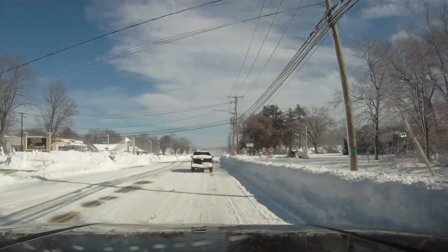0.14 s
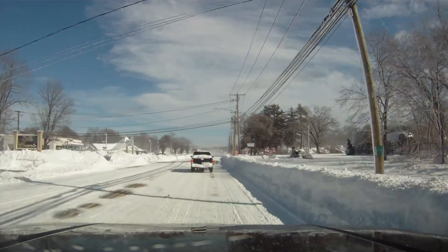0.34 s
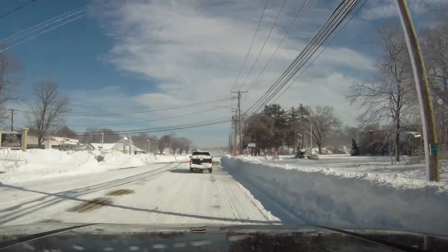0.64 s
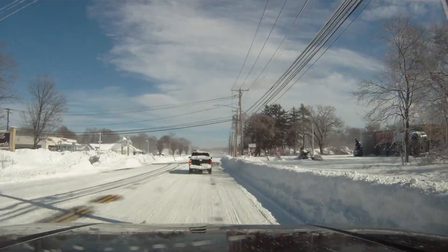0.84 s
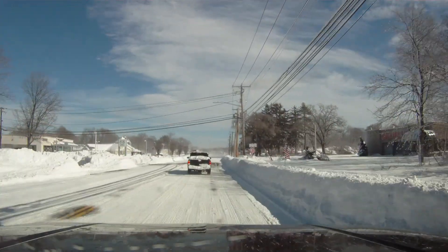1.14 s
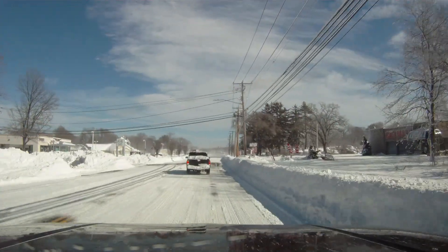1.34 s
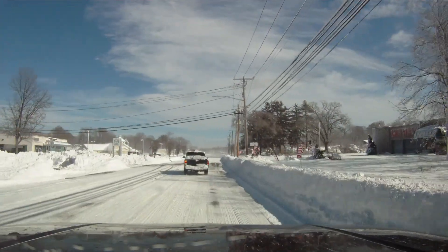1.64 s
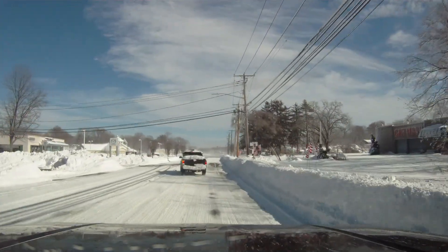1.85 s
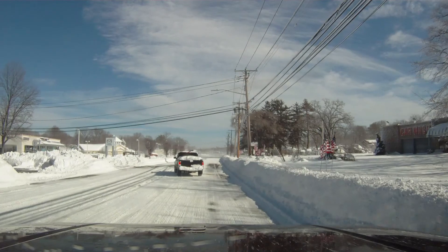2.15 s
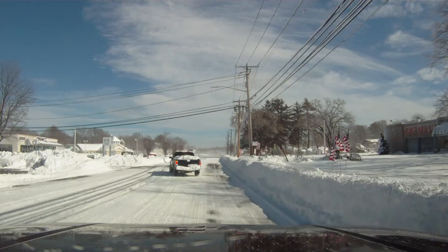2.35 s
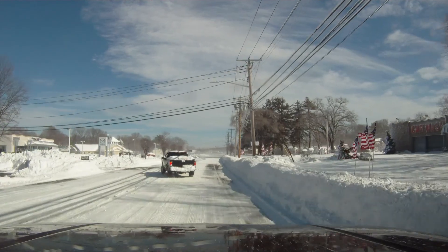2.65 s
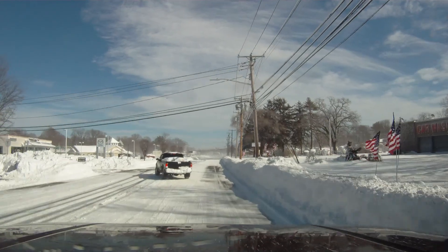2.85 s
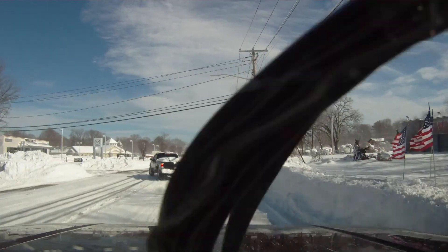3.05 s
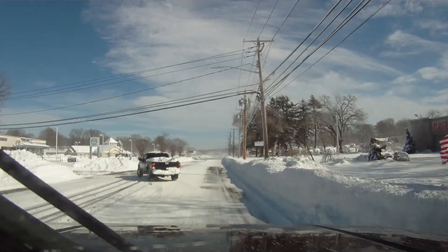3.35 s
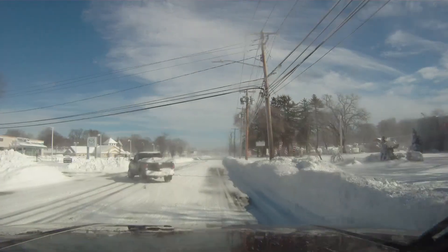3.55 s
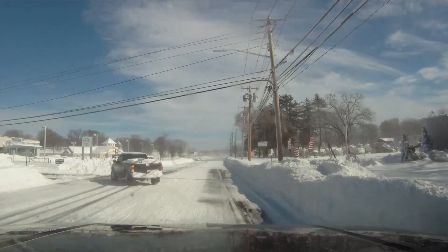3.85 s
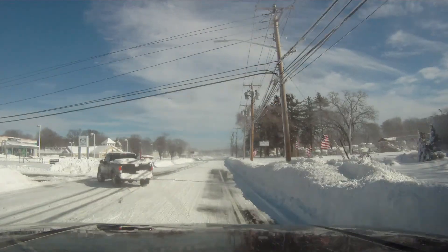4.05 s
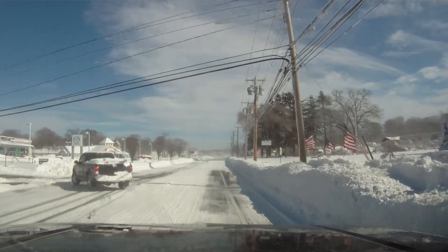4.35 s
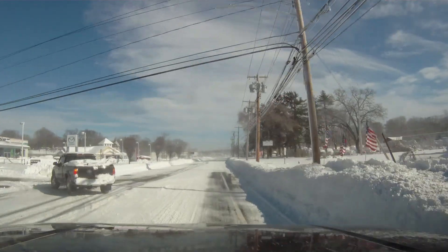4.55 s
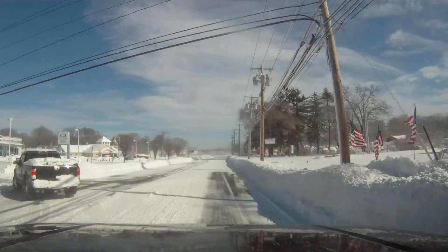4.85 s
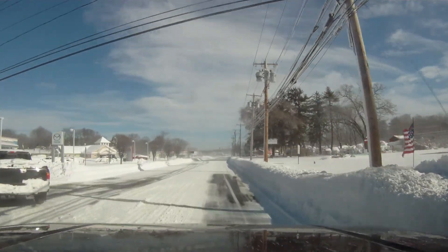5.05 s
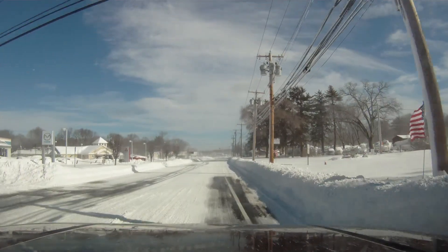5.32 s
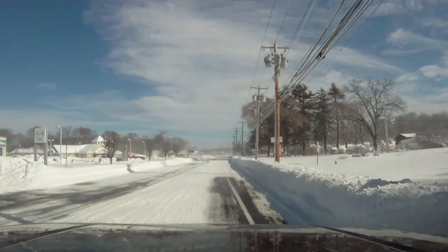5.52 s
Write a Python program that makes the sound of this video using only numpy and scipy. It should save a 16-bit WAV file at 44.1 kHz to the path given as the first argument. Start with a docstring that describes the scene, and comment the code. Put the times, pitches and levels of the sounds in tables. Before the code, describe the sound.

Low cabin rumble and engine hum on a snowy road, with small rattles, interrupted by one loud, juddering wiper scrape before the hum rises higher.

```python
"""A car rumbles along a snowy road, heard from a camera mounted behind the windscreen: shaped noise
for body and snow, stacked sines for the engine, ringing noise puffs for ticking plastic and thin chirps.
Ruts jolt and creak; the engine holds its pitch, then climbs from about two seconds.
Midway the wipers knock, rasp and judder over icy glass: random slips and snags ring the pane.
A gain control pulls the whole mix down while they scrape."""
import sys
import numpy as np
from scipy import signal
from scipy.fft import rfft, irfft
from scipy.io import wavfile
from scipy.ndimage import uniform_filter1d

SR = 44100
rng = np.random.default_rng(int(sys.argv[2]) if len(sys.argv) > 2 else 0)


def generate_wav(sig):
    """Save sig (samples, or channels by samples) to the path in sys.argv[1] as 16-bit PCM at SR."""
    pcm = np.round(np.clip(np.atleast_2d(sig).T, -1, 1) * 32767).astype(np.int16)
    wavfile.write(sys.argv[1], SR, pcm)


N = 250488
T = np.arange(N) / SR


def amp(db):
    """Turns decibels into an amplitude factor."""
    return 10 ** (np.asarray(db) / 20)


def unit(x):
    """Scales to rms 1."""
    return x / np.sqrt(np.mean(x ** 2) + 1e-20)


def curve(rows, column=1):
    """One column of a table, joined by straight lines in time."""
    rows = np.array(rows)
    return np.interp(T, rows[:, 0], rows[:, column])


def envelope(start, end, rise_s, fall_s):
    """Rises from start, holds until end, then dies away exponentially."""
    rise = np.clip((T - start) / rise_s, 0, 1)
    return rise * np.exp(-np.maximum(T - end, 0) / fall_s)


def decay(t, t60):
    """Exponential fading that drops 60 dB in t60 seconds."""
    return np.exp(-np.log(1000) * t / t60)


def smooth(x, seconds):
    """Follows x with a lag."""
    r = np.exp(-1 / (seconds * SR))
    return signal.lfilter([1 - r], [1, -r], x)


def add(mix, s, sound):
    """Lays a sound into the mix at time s."""
    part = mix[max(round(s * SR), 0):][:len(sound)]
    part += sound[:len(part)]


def spectrum_db(points, hz):
    """Joins the points of a spectrum by straight lines over log frequency."""
    f, db = np.transpose(points)
    return np.interp(np.log(hz + 1), np.log(f), db)


def noise(points):
    """Steady noise with the given spectrum shape, rms 1."""
    hz = np.fft.rfftfreq(N, 1 / SR)
    return unit(irfft(rfft(rng.standard_normal(N)) * amp(spectrum_db(points, hz)), N))


def wander(hz):
    """Slow random drift, up to about hz, rms 1."""
    f = np.fft.rfftfreq(N, 1 / SR)
    return unit(irfft(rfft(rng.standard_normal(N)) / (1 + (f / hz) ** 4), N))


def response(points, modes=(), size=4096):
    """Causal (minimum-phase) impulse response of a spectrum with resonances on top."""
    hz = np.fft.rfftfreq(size, 1 / SR)
    db = spectrum_db(points, hz)
    for at, width, lift in modes:
        db = db + lift / (1 + (2 * (hz - at) / width) ** 2)
    # folding the cepstrum moves all the energy after the strike
    cepstrum = irfft(np.log(amp(db)))
    cepstrum[1:size // 2] *= 2
    cepstrum[size // 2 + 1:] = 0
    return irfft(np.exp(rfft(cepstrum)))


def burst(colour, t60, rise_s, size=4096):
    """A coloured puff of noise that builds up and dies, peak 1."""
    t = np.arange(size) / SR
    swell = (1 - np.exp(-t / rise_s)) * decay(t, t60)
    x = signal.fftconvolve(rng.standard_normal(size) * swell, colour)[:size]
    return x / abs(x).max()


def repeat_bursts(rows, points, t60, lift_db, fresh, rise_s):
    """One noise puff sounds again and again, each time a little differently."""
    colour, out = response(points), np.zeros(N)
    ring = burst(colour, t60, rise_s)
    for s, db in rows:
        hit = ring + fresh * burst(colour, t60, rise_s)
        add(out, s, amp(db + lift_db) * hit / abs(hit).max())
    return out


def speed():
    """Gain in speed since the start, in octaves of engine pitch."""
    return np.log2(curve(ENGINE_RUN) / ENGINE_RUN[0][1])


# Shape of the body rumble: freq_hz, relative level_db (per Hz)
RUMBLE_SHAPE = [(10, -22.5), (18, -20.5), (26, -9), (36, -2.5), (42, -1.5), (49, -3), (58, -6.5),
                (70, -13.5), (82, -19), (114, -20), (150, -26), (220, -55), (350, -110)]
# Roughness of the road, which drives rumble, roar and hiss: time_s, relative level_db
ROAD_ROUGHNESS = [(0, 0), (0.75, 0.5), (1.3, -0.5), (1.7, 0.5), (2.15, -0.5), (2.39, -3.5), (2.5, 1.5),
                  (3.2, -0.5), (3.65, 7), (3.93, -2.5), (4.25, -1), (5.68, 3)]


def body(level_db=-18.0, db_per_octave=-1.0):
    """The car body shakes as the wheels ride the ruts; its swells are evened out."""
    rumble = noise(RUMBLE_SHAPE)
    rumble /= np.sqrt(uniform_filter1d(rumble ** 2, size=7000) + 0.028)
    return amp(level_db + curve(ROAD_ROUGHNESS) + db_per_octave * speed()) * rumble


# Shape of the snow roar: freq_hz, relative level_db (per Hz)
ROAR_SHAPE = [(53, -23), (90, -9.5), (118, -4.5), (150, -17), (177, -9.5), (242, -14.5), (302, -12),
              (429, -21), (470, -20), (648, -30.5), (1000, -45), (1300, -73), (2200, -120)]
# Shape of the snow hiss: freq_hz, relative level_db (per Hz)
HISS_SHAPE = [(500, -3), (900, -0.5), (1500, -5.5), (2800, -5), (4400, -13), (5300, -19.5), (6000, -32.5),
              (7200, -18), (9200, -14.5), (10800, -23.5), (12000, -7.5), (13100, -31), (14900, -16),
              (15800, -34)]


def tyres(roar_db=-31.0, roar_db_per_octave=4.5, roar_follow=0.78, hiss_db=-50.0, hiss_db_per_octave=3.0,
          hiss_follow=0.52, lumpy_db=1.48, hiss_lumpy_db=1.42, flicker_db=2.5):
    """Roar and hiss of packed snow grow with speed and rough road, and flutter with its lumps."""
    lumps, road, fast = wander(24), curve(ROAD_ROUGHNESS), speed()
    roar_level = roar_db + roar_db_per_octave * fast + roar_follow * road + lumpy_db * lumps
    hiss_level = hiss_db + hiss_db_per_octave * fast + hiss_follow * road + hiss_lumpy_db * lumps
    hiss_level = hiss_level + flicker_db * wander(86)
    return noise(ROAR_SHAPE) * amp(roar_level) + noise(HISS_SHAPE) * amp(hiss_level)


# Shape of a thin hiss high up: freq_hz, relative level_db (per Hz)
WHINE_SHAPE = [(10700, -50), (11550, -11.5), (12000, 6), (12450, -21), (13300, -42)]


def whine(level_db=-62.0, rise_db=5.5):
    """A narrow band of hiss that slowly grows louder."""
    return noise(WHINE_SHAPE) * amp(level_db + rise_db * T / T[-1])


# Run of the engine: time_s, firing_hz, level_db (rms of an order at 0 dB)
ENGINE_RUN = [(0, 50, -27.5), (2.1, 50, -30), (2.7, 54.3, -26.5), (3.35, 62.89, -25.5), (3.8, 66.3, -25),
              (4.3, 68.6, -23), (5.68, 71.36, -22.5)]
# Firing hum and drive train: multiple (of the firing rate), relative level_db
DRIVE_ORDERS = [(0.998, 1), (1.379, -14), (1.571, -7), (2.004, -15.5), (2.62, -20)]


def engine(waver=0.0063, throb_db=2.0):
    """Firing hum and the orders of the drive train: sines locked to one wavering pitch."""
    turns = np.cumsum(curve(ENGINE_RUN) * (1 + waver * wander(6.1))) / SR
    hum = np.zeros(N)
    for multiple, db in DRIVE_ORDERS:
        tone = np.sin(2 * np.pi * (multiple * turns + rng.random()))
        hum += amp(db + throb_db * wander(4.5)) * tone
    return np.sqrt(2) * amp(curve(ENGINE_RUN, 2)) * hum


def faint_ticks(count=60, per_s=2.5, level_db=-38.5, spread_db=2):
    """Among the hard ticks the loose part taps softly, at random: start_s, level_db before the lift."""
    gap, strength = rng.random((count, 2)).T
    times = np.cumsum(2 * gap / per_s)
    levels = level_db + spread_db * (2 * strength - 1)
    return [(s, db) for s, db in zip(times, levels) if s < T[-1]]


# Hardest ticks of a loose plastic part: start_s, peak level_db (before the lift)
HARD_TICKS = [(0.0607, -31.5), (0.1228, -36), (0.2638, -29.5), (0.4558, -34.5), (0.5589, -29), (0.594, -29),
              (0.6372, -29.5), (0.6717, -28), (0.715, -33), (0.7536, -24.5), (0.8939, -29), (0.9717, -33.5),
              (1.0565, -26.5), (1.1079, -34.5), (1.1689, -26), (1.4277, -34), (1.5262, -32.5),
              (1.6217, -32.5), (1.6544, -32), (1.7018, -25.5), (1.732, -28.5), (1.7782, -29.5),
              (1.9031, -30), (2.1141, -29.5), (2.147, -28.5), (2.195, -34), (3.3207, -31), (3.3508, -28.5),
              (3.4838, -29.5), (3.5119, -30.5), (3.8611, -35), (3.9427, -33.5), (4.0627, -30),
              (4.0966, -28), (4.2318, -31.5), (4.2691, -35), (4.3061, -33), (4.342, -34.5), (4.3896, -36.5),
              (4.587, -28), (4.8464, -27), (4.8918, -32), (4.9226, -30), (5.011, -35), (5.0881, -32),
              (5.3602, -34), (5.4765, -34), (5.5303, -30.5), (5.5588, -30)]
# Colour of a tick: freq_hz, relative level_db
TICK_SHAPE = [(600, -25.5), (1100, -3), (2400, -15), (2950, 1.5), (3900, -1.5), (4800, -15.5), (5400, -16),
              (6000, -39), (7000, -20), (8400, -7.5), (9200, -10.5), (10000, -26.5), (14000, -22.5),
              (14900, -13), (15800, -20.5)]


def ticks():
    """A loose plastic part ticks as short bright puffs, hard ones timed and soft ones random."""
    rows = list(HARD_TICKS) + faint_ticks()
    return repeat_bursts(rows, TICK_SHAPE, t60=0.057, lift_db=1.15, fresh=0.16, rise_s=0.00053)


# Beats on which the thin chirp sounds: beat (count from the first)
CHIRP_STEPS = [0, 2, 4, 8, 11, 14, 20, 24, 27, 30, 32, 34]
# Colour of a chirp: freq_hz, relative level_db
CHIRP_SHAPE = [(2000, -20), (3400, 6.5), (4200, -3.5), (5300, 2.5), (6000, -17.5), (6800, 0), (8200, -7),
               (9600, -21), (15000, -10)]


def chirps(start_s=0.203, beat_s=0.1582, peak_db=-37):
    """A thin chirp on a steady beat, skipping most beats."""
    rows = [(start_s + beat_s * beat, peak_db) for beat in CHIRP_STEPS]
    return repeat_bursts(rows, CHIRP_SHAPE, t60=0.1, lift_db=0, fresh=0.28, rise_s=0.0025)


# Ruts in the road: time_s, push_db (peak), creak_db (peak, before the lift)
RUTS = [(0.305, -5, -29), (0.416, -5, -32), (0.776, -4, -33), (0.908, -6, -28), (1.664, -7, -30),
        (1.722, -22, -26), (2.079, -6, -30), (3.826, -4.5, -21.5), (4.794, -5.5, -30)]


def jolts(swing_hz=42.2, half_length_s=0.0086, size=4000):
    """Each deep rut swings the body once, a brief low pulse centred on the rut."""
    t, out = (np.arange(size) - size / 2) / SR, np.zeros(N)
    swing = np.cos(2 * np.pi * swing_hz * t) * np.exp(-(t / half_length_s) ** 2)
    for s, push_db, _ in RUTS:
        add(out, s + t[0], amp(push_db) * swing)
    return out


def creaks():
    """The mount creaks on each rut, a very short hissy puff."""
    rows = [(s, creak_db) for s, _, creak_db in RUTS]
    return repeat_bursts(rows, HISS_SHAPE, t60=0.013, lift_db=1.5, fresh=1.1, rise_s=0.0024)


def cabin_boom(start_s=0.65, end_s=1.174, rise_s=0.41, fall_s=0.049, peak_db=-15, boom_hz=36, waver=0.053):
    """The cabin air resonates for a moment, a low sine with a wavering pitch."""
    boom = np.sin(2 * np.pi * np.cumsum(boom_hz * (1 + waver * wander(4.3))) / SR)
    return boom * amp(peak_db) * envelope(start_s, end_s, rise_s, fall_s)


# Dull knocks of body and wiper arms: start_s, ring_db, pitch_hz, ring_s (to -60 dB), clatter_db (peak)
DULL_KNOCKS = [(2.002, -10, 241, 0.084, -19), (2.004, -13, 151, 0.18, -32),
               (2.528, -13.5, 196, 0.057, -16.5), (2.586, -17, 386, 0.035, -11),
               (2.681, -11.5, 107, 0.24, -16.5), (2.789, -4.5, 125, 0.061, -12),
               (3.288, -27, 292, 0.053, -21), (3.327, -17.5, 343, 0.067, -18),
               (3.813, -11, 120.7, 0.19, -40)]
# Colour of the clatter: freq_hz, relative level_db
CLATTER_SHAPE = [(100, 1), (250, -2.5), (600, -5.5), (1200, -15), (1600, -25.5), (3000, -23), (4600, -44),
                 (6000, -64), (7500, -43), (9500, -35), (12200, -30), (15000, -43)]


def knocks(clatter_t60=0.07, rise_s=0.0016, size=6000):
    """Body and wiper arms knock: a short low ring under a dull clatter."""
    t, out, colour = np.arange(size) / SR, np.zeros(N), response(CLATTER_SHAPE)
    for s, ring_db, hz, t60, clatter_db in DULL_KNOCKS:
        ring = -np.sin(2 * np.pi * hz * t) * decay(t, t60)
        add(out, s, amp(ring_db) * ring)
        add(out, s, amp(clatter_db) * burst(colour, clatter_t60, rise_s))
    return out


# Blades drag lightly, bite into the ice, then slide to rest: start_s, end_s, drag_db (as each starts)
BLADE_STROKES = [(2.67, 2.785, -32.5), (2.784, 3.184, -15), (3.192, 3.225, -22.5)]


def drag(bite_s=0.014, growth_db_per_s=6.5, let_go_s=0.0075):
    """How hard the blades rub on the glass: each stroke builds up, grows heavier and lets go."""
    total = np.zeros(N)
    for start, end, db in BLADE_STROKES:
        load_db = db + growth_db_per_s * (np.clip(T, start, end) - start)
        total += amp(load_db) * envelope(start, end, bite_s, let_go_s)
    return total


def wiper_arms(start_s=2.5, end_s=3.35, rise_s=0.17, fall_s=0.03, rumble_db=-28.5, swish_db=-52, judder_db=-7):
    """The moving arms rumble and swish, and judder when the blades drag."""
    moving = envelope(start_s, end_s, rise_s, fall_s)
    low = noise(ROAR_SHAPE) * (amp(rumble_db) * moving + amp(judder_db) * drag())
    swish = noise(HISS_SHAPE) * amp(swish_db) * moving
    return low + swish


# Colour of the screen: freq_hz, relative level_db
GLASS_SHAPE = [(60, -17.5), (165, 0), (520, -0.5), (740, -13.5), (1100, -10.5), (1400, -17), (2900, -21),
               (4400, -18.5), (5200, -38.5), (6100, -43.5), (7000, -35.5), (7900, -22.5), (12000, -30),
               (15200, -30)]
# Resonances of screen and mount: freq_hz, width_hz, lift_db (negative cuts)
SCREEN_MODES = [(174, 35, 7.5), (401, 80, 4.5), (525.5, 27, 5.5), (972, 230, 6), (1115, 80, 5),
                (2305, 270, 11), (2920, 234, 12.5), (3620, 210, -5), (8800, 350, -10), (9120, 160, 12),
                (10430, 170, -9), (13300, 600, -2)]


def glass_ring(echo=0.033, echo_t60=0.02, size=1200):
    """Ring of screen and mount; the sound bounces between the pane's edges along fixed paths."""
    t = np.arange(size) / SR
    paths = echo * rng.standard_normal(size) * decay(t, echo_t60)
    paths = signal.lfilter(*signal.butter(3, 2800, "high", fs=SR), paths)
    paths[0] += 1  # the direct sound
    return signal.fftconvolve(response(GLASS_SHAPE, SCREEN_MODES), paths)


def blade_scrape(glass, slips_per_s=650, spread_db=3.0, rub=0.14, rasp_db=0.5):
    """Rubber sticks and slips on icy glass; each random slip rings the screen and the mount."""
    happens = rng.random(N) < slips_per_s / SR
    strength = amp(spread_db * np.minimum(rng.exponential(1, N), 2.5))
    slips = happens * strength * rng.choice([-1, 1], N)
    rubbing = unit(slips) + rub * rng.standard_normal(N)
    force = amp(rasp_db) * drag() * rubbing
    return signal.fftconvolve(force, glass / np.linalg.norm(glass))[:N]


# Blades snag and snap free: start_s, peak level_db (before the lift)
BLADE_SNAGS = [(2.758, -18.5), (2.804, -12.5), (2.823, -6.5), (2.8336, -3.5), (2.8495, 2.5), (2.8723, -3.5),
               (2.92, -4), (2.929, -1), (2.9416, -9), (2.9971, 3.5), (3.032, -15), (3.0888, -5),
               (3.1333, 4.5), (3.1414, -0.5), (3.1515, 2), (3.176, 1)]


def blade_snags(glass, lift_db=3.0, snag_t60=0.015, scatter=0.17, size=1200):
    """A snag lets go faster than a slip, so its kick to the glass carries less bass."""
    t, out = np.arange(size) / SR, np.zeros(N)
    sharp = signal.lfilter(*signal.butter(1, 450, "high", fs=SR), glass)
    for s, db in BLADE_SNAGS:
        push = scatter * rng.standard_normal(size) * decay(t, snag_t60)
        push[0] -= 1
        snap = signal.fftconvolve(push, sharp)
        add(out, s, amp(db + lift_db) * snap / abs(snap).max())
    return out


def wiper_drive(start_s=2.72, full_s=3.05, end_s=3.18, start_hz=162.6, full_hz=184.5, start_db=-24,
                growth_db_per_s=27.5, waver=0.02103, second_db=-8, third_db=-14, flutter_db=0.2,
                rise_s=0.043, fall_s=0.014):
    """The loaded wipers drone on three harmonics, rising in pitch until they reach full speed."""
    hz = np.interp(T, [start_s, full_s], [start_hz, full_hz])
    phase = 2 * np.pi * np.cumsum(hz * (1 + waver * wander(38.6))) / SR
    tone = np.sin(phase) + amp(second_db) * np.sin(2 * phase) + amp(third_db) * np.sin(3 * phase)
    load_db = start_db + growth_db_per_s * (np.clip(T, start_s, end_s) - start_s)
    return unit(tone) * amp(load_db + flutter_db * wander(30)) * envelope(start_s, end_s, rise_s, fall_s)


def scene():
    """Road, engine, ticks, chirps and wipers, as heard in the cabin."""
    road = body() + tyres() + whine() + engine()
    small_sounds = ticks() + chirps()
    ruts = jolts() + creaks()
    glass = glass_ring()
    wipers = wiper_arms() + blade_scrape(glass) + blade_snags(glass) + wiper_drive()
    return (road + small_sounds + ruts + cabin_boom() + knocks() + wipers)[None]


def record(dry, limit_db=-13, ratio=10, recover_db_per_s=45.5, sense_s=0.0095, clamp_s=0.0013, edge_hz=15700):
    """The camera's gain control ducks whatever passes the limit; then full-scale clip and treble cut."""
    power_db = 10 * np.log10(smooth(dry[0] ** 2, sense_s) + 1e-12)
    # the sensed level jumps up with each peak and sinks back at a steady rate
    recovery = recover_db_per_s * T
    held_db = np.maximum.accumulate(power_db + recovery) - recovery
    over_db = np.maximum(held_db - limit_db, 0)
    ducked = dry / amp(smooth(over_db, clamp_s) * (1 - 1 / ratio))
    lowpass = signal.firwin(401, edge_hz, window=("kaiser", 9), fs=SR)
    return signal.oaconvolve(np.clip(ducked, -1, 1), lowpass[None], "same")


dry = scene()
out = record(dry)
generate_wav(out)
```